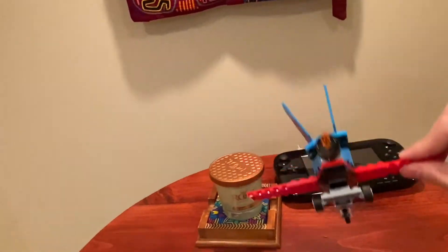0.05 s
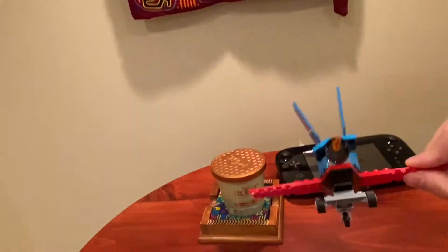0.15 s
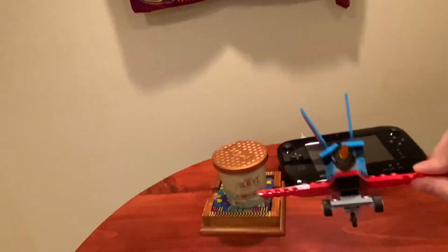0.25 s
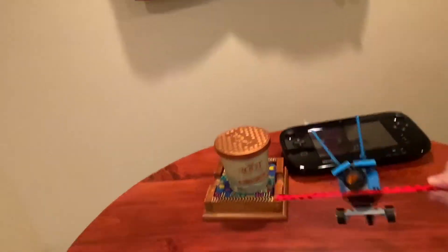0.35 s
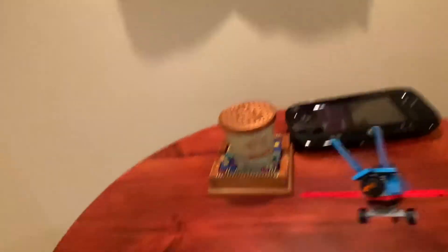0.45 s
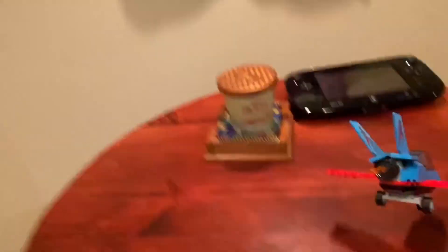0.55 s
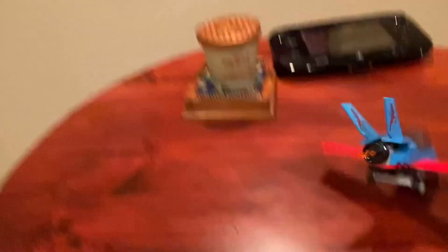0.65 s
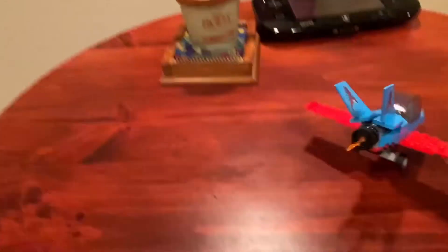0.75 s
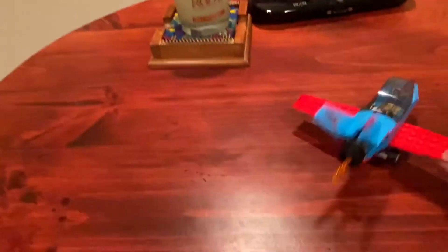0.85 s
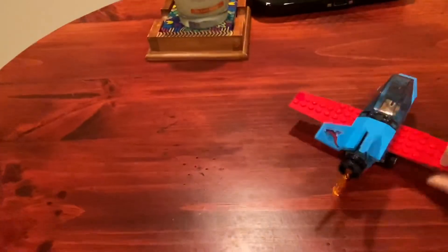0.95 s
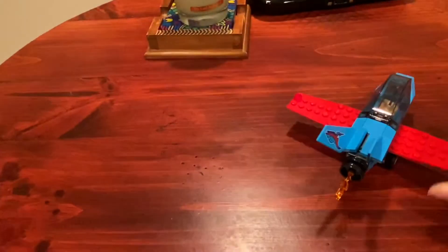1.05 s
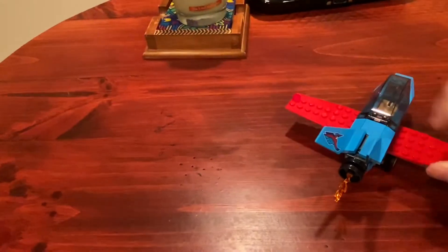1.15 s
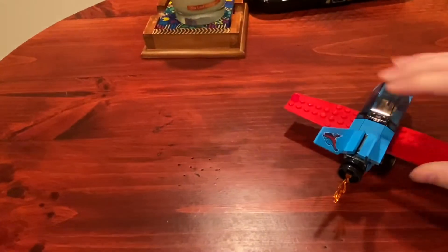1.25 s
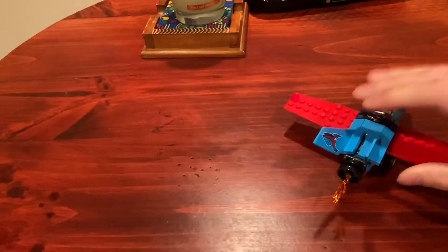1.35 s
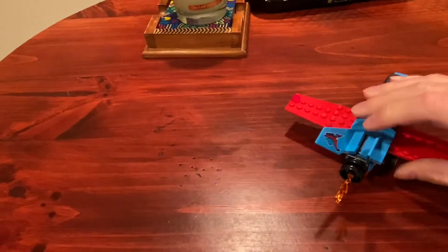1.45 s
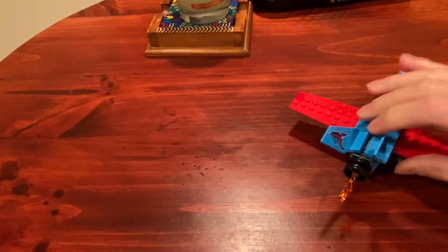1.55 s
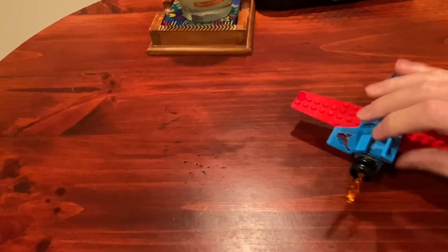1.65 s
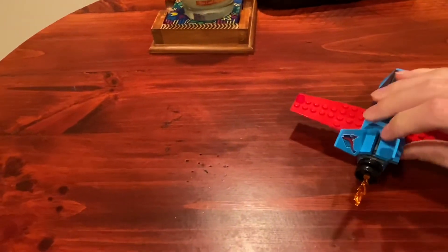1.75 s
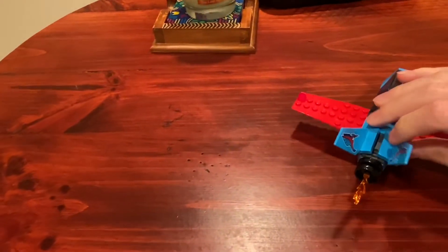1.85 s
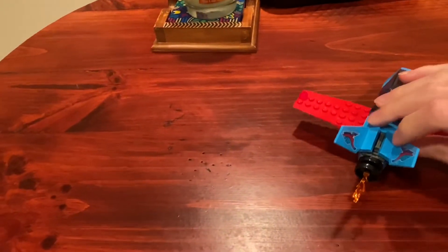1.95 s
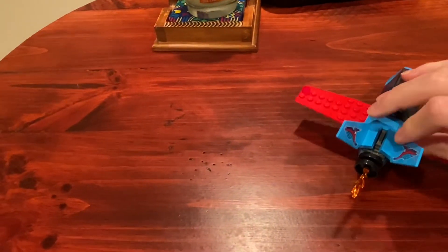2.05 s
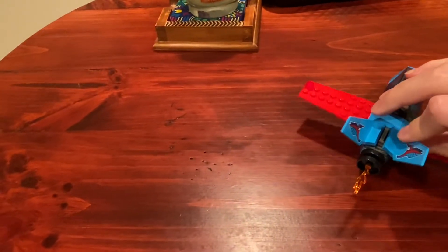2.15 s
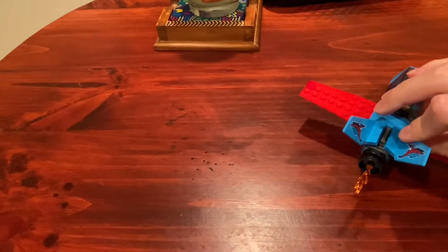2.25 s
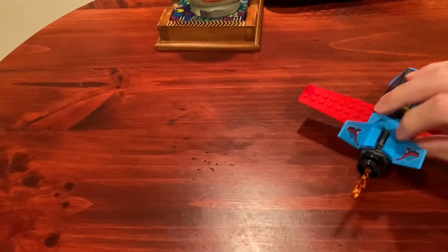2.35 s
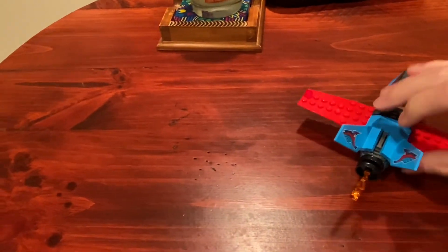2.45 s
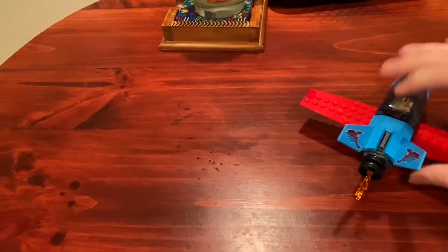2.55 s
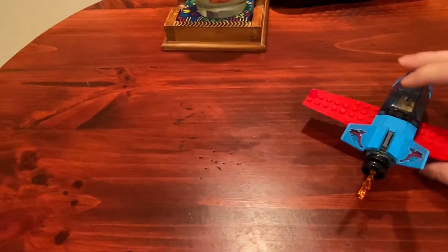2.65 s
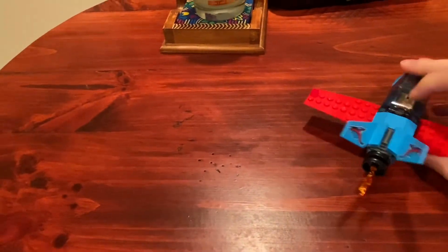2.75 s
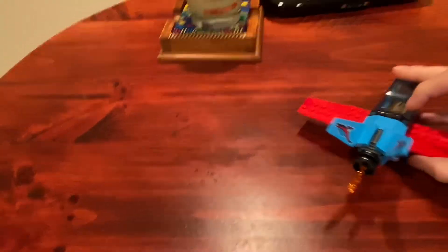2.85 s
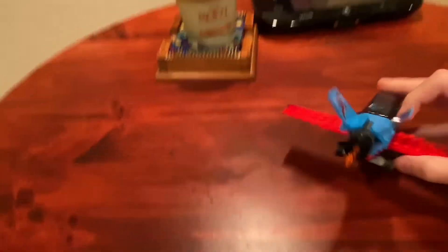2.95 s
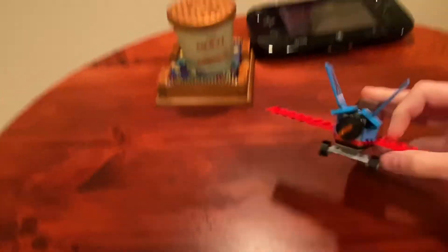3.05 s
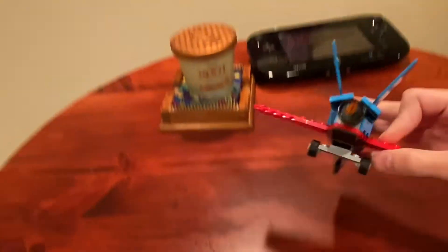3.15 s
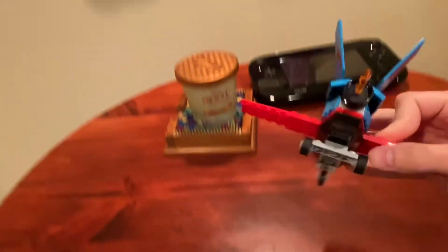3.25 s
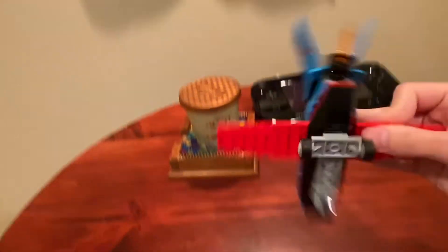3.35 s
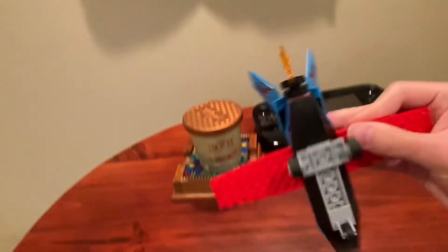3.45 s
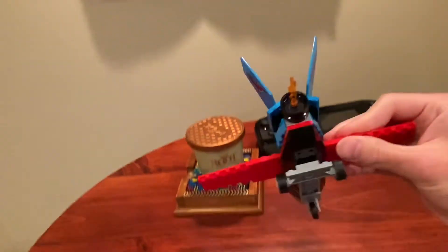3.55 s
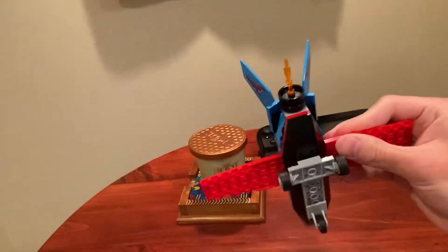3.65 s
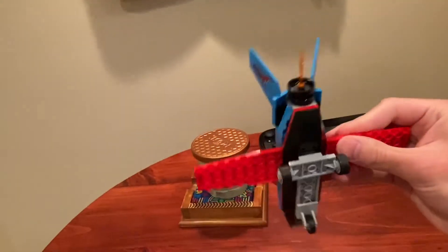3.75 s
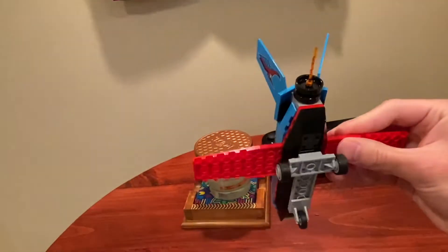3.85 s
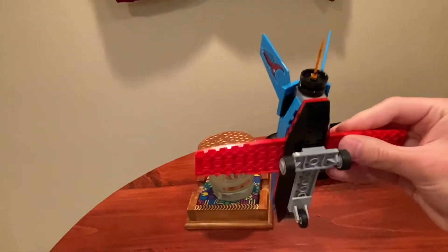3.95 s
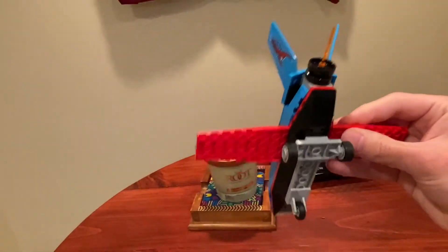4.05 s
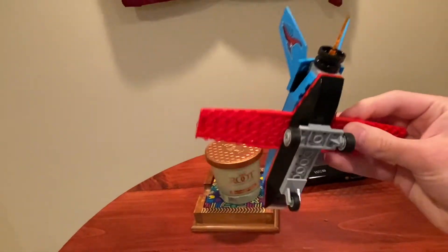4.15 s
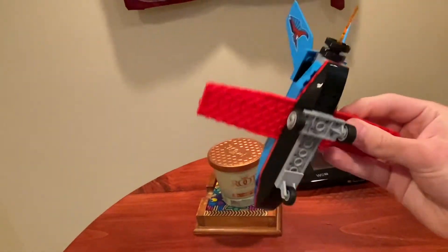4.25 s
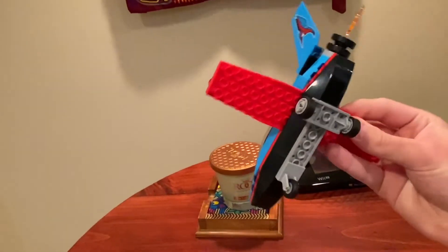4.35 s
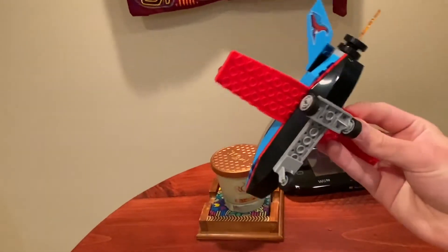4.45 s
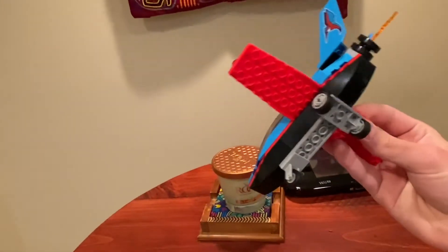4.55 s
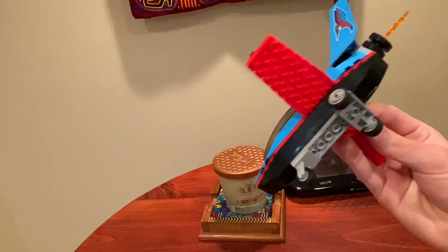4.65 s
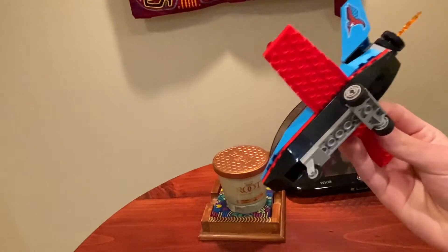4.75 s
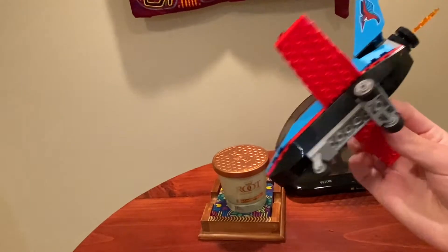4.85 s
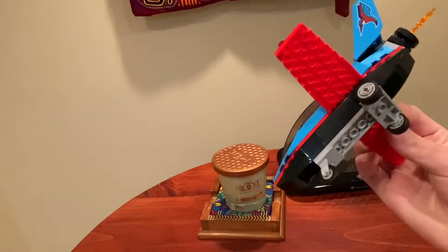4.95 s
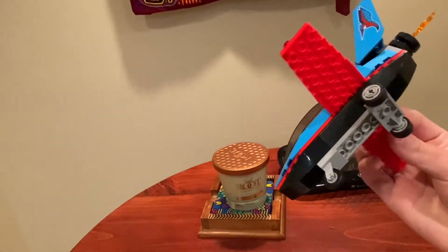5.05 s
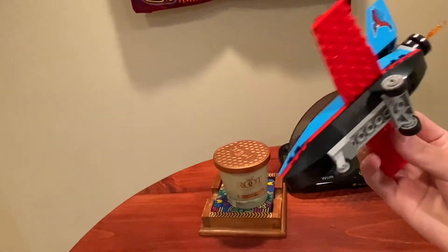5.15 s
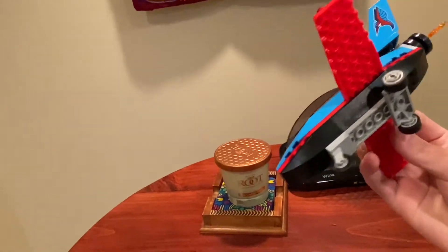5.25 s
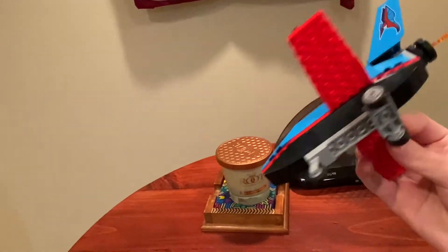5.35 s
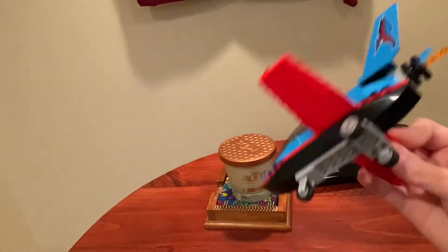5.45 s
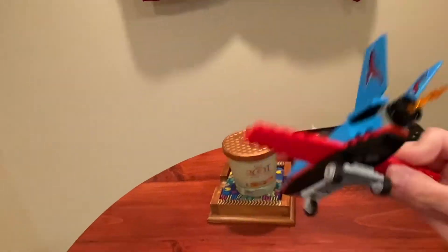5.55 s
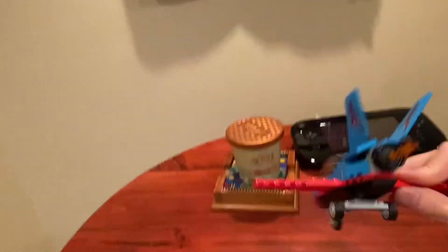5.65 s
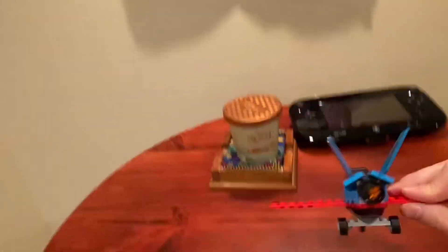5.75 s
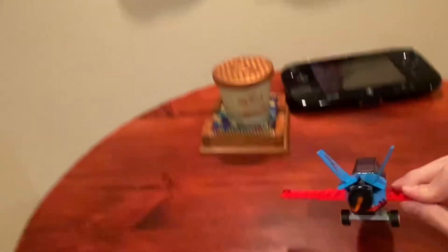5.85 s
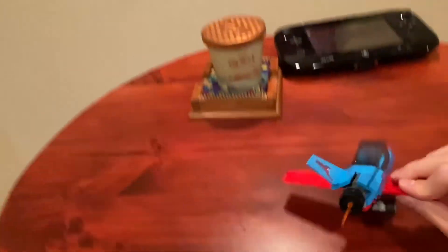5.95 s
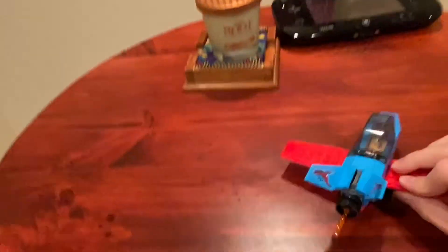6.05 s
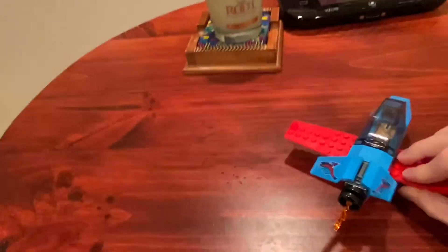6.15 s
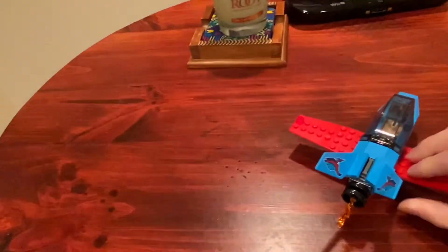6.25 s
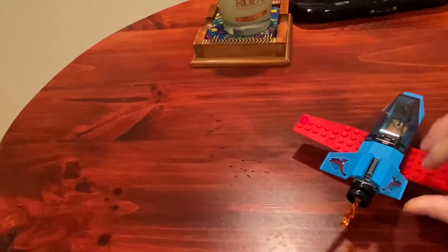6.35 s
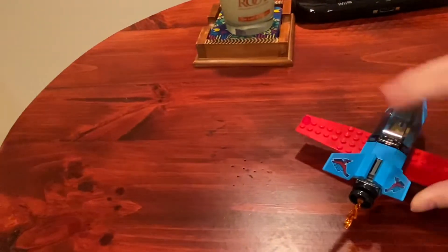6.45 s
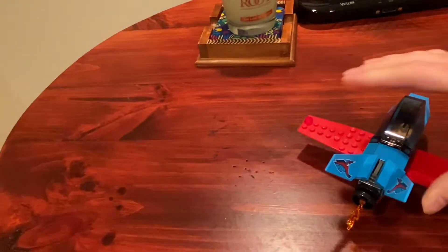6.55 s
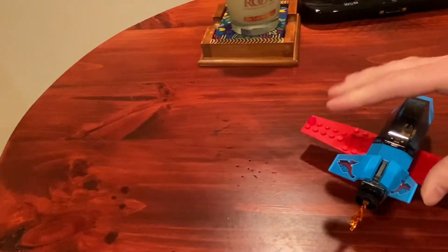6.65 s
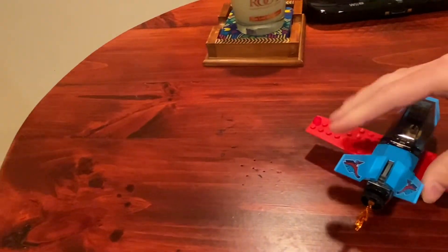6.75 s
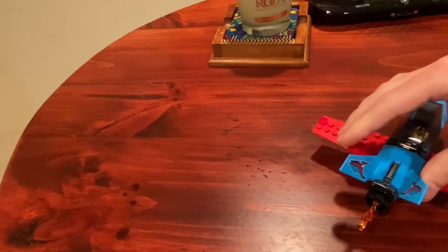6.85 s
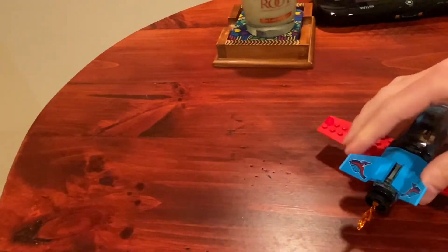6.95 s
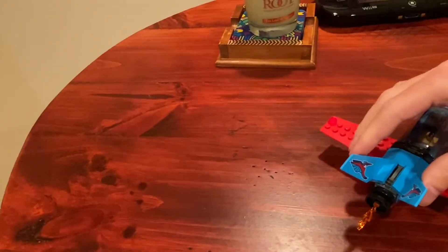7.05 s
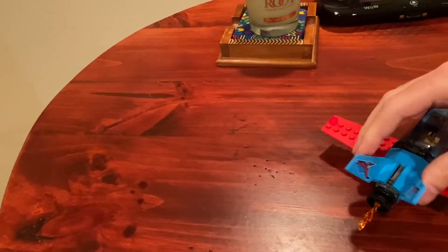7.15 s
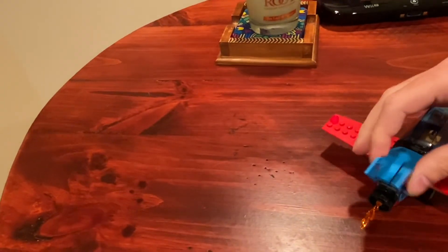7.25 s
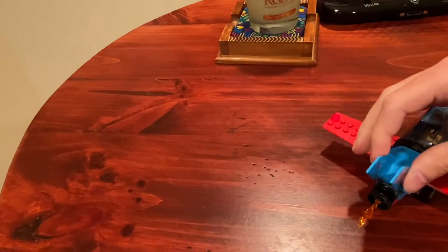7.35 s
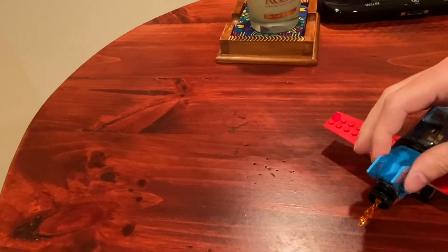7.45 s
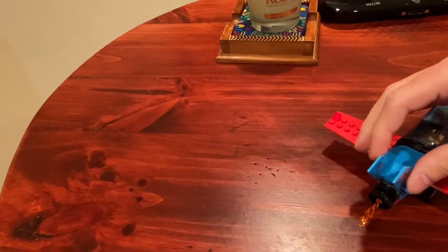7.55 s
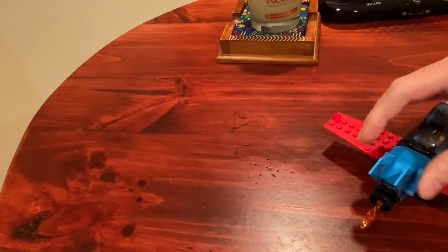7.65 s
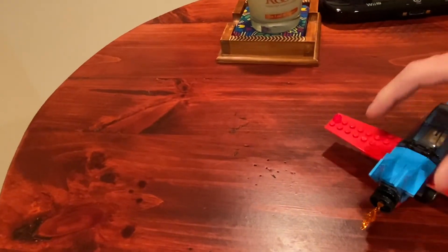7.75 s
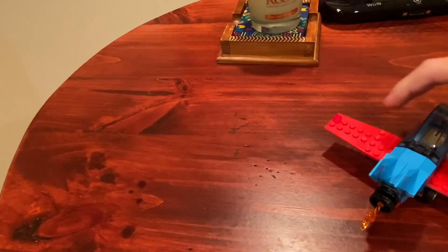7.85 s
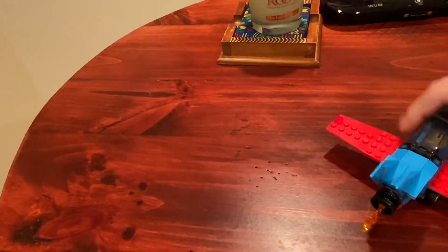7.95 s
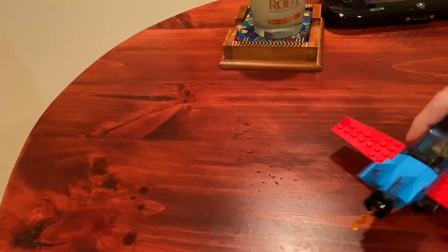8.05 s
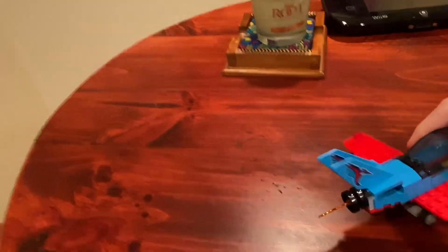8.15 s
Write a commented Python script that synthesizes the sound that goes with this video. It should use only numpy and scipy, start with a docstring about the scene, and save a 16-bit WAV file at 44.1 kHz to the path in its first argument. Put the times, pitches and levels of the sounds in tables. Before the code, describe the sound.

A small plastic brick aeroplane is handled close to a phone microphone in a small quiet room. A sharp double clack with wooden thuds and scraping comes first, then sparse light clicks as fingers press, lift and turn it. A second hard burst of clatter on the table follows, then faint ticks and a last few clicks. A low pulsing hum stays underneath.

```python
"""A plastic brick aeroplane is set down, pressed, lifted and turned over a wooden table, close to a phone.
Loud clicks, rubbing and table thuds come from 0.6 to 1 s, mostly softer ones until 5.7 s, a second loud
burst around 6 s and a last few up to 8.1 s. Chattering contacts ring the plastic, soft pushes the table,
dense slips the rubbed parts. A small room rings after them; beating hum, rumble and air run throughout.
"""
import sys
import numpy as np
from scipy import signal
from scipy.fft import rfft, irfft, next_fast_len
from scipy.io import wavfile
from scipy.ndimage import uniform_filter1d

SR = 44100
rng = np.random.default_rng(int(sys.argv[2]) if len(sys.argv) > 2 else 0)


def unload_wav(signal):
    """Save mono or channel-first audio to the path in sys.argv[1] as 16-bit WAV at rate SR, clipped to [-1, 1]."""
    wavfile.write(
        sys.argv[1],
        SR,
        np.round(np.clip(np.atleast_2d(signal).T, -1, 1) * 32767).astype(np.int16),
    )


N = 361619  # samples, 8.2 s

# ringing modes of the plastic toy: (f/Hz, level/dB)
PLASTIC_MODES = [(930, -9.5), (1200, -12.5), (1490, -12), (1790, -11.5), (2170, -10.5), (2550, -8.5),
                 (2880, -6.5), (3300, -7), (3800, -2.5), (4520, 0), (5250, 3), (6000, 5), (6760, 8),
                 (7600, -1.5), (8600, -23.5), (9730, 2.5), (11300, 3), (12600, -17.5), (15000, -26)]


def undb(db):
    """Decibels to gain."""
    return 10 ** (np.asarray(db) / 20)


def unit(x):
    """Scale to rms 1."""
    return x / np.sqrt(np.mean(x ** 2))


def band(x, lo_hz, hi_hz):
    """Band-pass."""
    return signal.sosfilt(signal.butter(2, [lo_hz, hi_hz], "band", fs=SR, output="sos"), x)


def decay(t, t60):
    """Exponential decay by 60 dB in t60 seconds."""
    return np.exp(-np.log(1000) * t / t60)


def stereo(left_minus_right_db):
    """Gains of the left and right channel for a level difference."""
    return undb([[left_minus_right_db / 2], [-left_minus_right_db / 2]])


def ring(modes, gain_db, detune, seconds):
    """Sum of decaying sines after one blow; modes are rows of (f/Hz, level/dB, t60/s)."""
    hz, db, t60 = np.transpose(modes)[:, :, None]
    t = np.arange(int(seconds * SR)) / SR
    waves = np.sin(2 * np.pi * hz * detune[:, None] * t)
    return (undb(db + gain_db[:, None]) * decay(t, t60) * waves).sum(axis=0)


def add(out, s, sound, pan_db):
    """Place a sound at time s in both channels."""
    i = int(s * SR)
    n = min(len(sound), N - i)
    out[:, i:i + n] += sound[:n] * stereo(pan_db)


def swell(s, rise_s, hold_s, fade_s):
    """Envelope: rise from time s, hold, then a steady fade by 30 dB per fade_s, down to -120 dB."""
    t = np.arange(N) / SR - s
    fades = np.clip((t - rise_s - hold_s) / max(fade_s, 1e-3), 0, 4)  # negative fade times act as 1 ms
    return np.clip(t / rise_s, 0, 1) * undb(-30 * fades)


def clicks():
    """A quick chatter of contacts rings the modes, per click in its own mix; returns phone and wall signals."""
    # clicks of the plastic, loudest near two pitches, level columns 5 to 7 against the lower pitch:
    # (t/s, peak level/dB, lower f/Hz, upper f/Hz, hollow body near 1 kHz level/dB, upper pitch level/dB,
    #  hard edges at 7 kHz level/dB, left minus right level/dB)
    click_rows = [(0.1835, -58.5, 1380.0, 5100, 1, -9, -32, -3),
                  (0.6335, -9.5, 1895, 4660, -5, -9, -11.5, -3),
                  (0.6787, -11, 1400.0, 3940.0, -13, -11.5, -12.5, -2),
                  (0.8605, -21.5, 1640, 3730, -2.5, -4.5, -12, -3.5),
                  (0.875, -23, 1810.0, 4090.0, -13, 0, -15, -1), (0.908, -23, 1850, 3600, -6, 4, -7, 0),
                  (0.9145, -23, 1780, 4050.0, -10, 3, -10, -2), (0.9468, -23.5, 1510, 2870, -2, -1, -9, -4),
                  (0.9584, -25.5, 1643, 4490.0, -11.5, -17, -28, -2),
                  (0.9909, -30, 2520, 3870, -15, 7, -6.5, 2), (1.0129, -43.5, 2460, 3960, -11, -15, -33, 2),
                  (1.4777, -51, 1830.0, 4960, -1.5, -2.5, -13.5, -3),
                  (1.6108, -59, 1610, 3830.0, -12, -15, -39, -2),
                  (1.6902, -25, 1470, 3830, -2.5, -1, -16.5, -5),
                  (1.9281, -48, 1630.0, 3820, -16, -5.5, -35, -2.5),
                  (2.3236, -53.5, 1430.0, 3680.0, 7, -21, -9, 0.5),
                  (2.3785, -57, 1470, 2840.0, -12, -17, -23, -1),
                  (2.4111, -38, 1546, 5640, -1.5, -7.5, -18, -1),
                  (2.4263, -38, 1460.0, 3940, -17, 0, -14, -3),
                  (2.457, -49.5, 1980, 4020, -16, -16, -31, -3),
                  (2.59, -48.5, 1540.0, 2920.0, 3, -14, -32.5, -1),
                  (2.6462, -41.5, 1500, 2820, -4, -19, -33, -2),
                  (2.7285, -45.5, 1570, 3650.0, -10.5, -3, -12.5, -3),
                  (2.738, -50.5, 1520, 2770, -20, -22, -33, 11),
                  (2.797, -21.5, 1622, 4020, -11.5, 2.5, -16, -2.5),
                  (2.8894, -39, 1570, 4250, -11, -3, -22, -3),
                  (3.1705, -53.5, 2130.0, 3940.0, -11, -24.5, -28, 2),
                  (3.2366, -22, 1264, 3500, -23.5, -11.5, -22.5, -0.5),
                  (3.3188, -48, 1250, 3210.0, -17, -6, -21, -3),
                  (3.336, -49, 1860, 2810.0, -25, -16, -26, -2),
                  (3.3833, -41.5, 1420, 3760, -28, -8.5, -15, -1),
                  (3.4944, -41, 1450.0, 2760, -7.5, -8, -26.5, -2),
                  (3.5243, -53.5, 1250.0, 4100, -8, 7, -8, 2),
                  (3.6223, -42, 1480, 2820.0, -10, -13.5, -11.5, -2),
                  (3.6504, -58, 1415, 3000, 1, -9, -14, 1), (3.676, -57, 1400, 4000, -19, -15, -15, -1),
                  (4.3297, -62.5, 1633, 4660, -14.5, 0.5, -22, 0),
                  (4.4359, -60, 1820, 2890, -12, -8, -36, 5),
                  (4.7871, -51.5, 1990.0, 3170, -1, -2, -17, -1),
                  (4.7982, -49.5, 1770, 3270.0, -19, 0, -19, -2),
                  (4.8134, -35.5, 1743, 3100, -12, -10.5, -19.5, -2),
                  (4.8782, -53, 1510, 2910.0, 1, 5, -15, 1), (4.9098, -48, 1930, 3880, -23, -6, -19, 2),
                  (4.941, -55, 1850, 4680.0, -20, -15, -29, -1),
                  (4.9619, -45, 1840, 4190, -12, -6.5, -16.5, -7),
                  (5.0564, -61, 1770.0, 3420.0, -23, -21, -28, -1),
                  (5.1163, -21.5, 1840, 3083, -6.5, -4.5, -15.5, -0.5),
                  (5.4736, -45.5, 1220, 3950, -8.5, -3.5, -12, 2.5),
                  (5.5122, -58.5, 1910, 2810.0, -12, -13, -25, -1),
                  (5.6768, -28.5, 1683, 4650, -13, 2.5, 1, -0.5),
                  (5.9273, -9.5, 1480, 4490, -4, -9.5, -10.5, -1.5),
                  (5.9735, -8, 1470, 4330, -9, -9.5, -11.5, -3.5),
                  (5.9966, -23.5, 1560, 3980.0, -2, -8, -13, 2), (6.0188, -15, 2480, 4660, -17, 0, -2, -4),
                  (6.0404, -14.5, 1460, 4460, -6, -9, -13.5, -2.5),
                  (6.051, -31, 1210.0, 3950, -10, 0, -19, -1), (6.0888, -24, 1480.0, 2850, 2.5, 1, -11, -2),
                  (6.1106, -29, 2510, 4200, -8, 8, -11, 0), (6.153, -29, 1560, 4700, -18, -18.5, -24, 0),
                  (6.1703, -35, 1480.0, 3970, -4, 7, 5, -30),
                  (6.5171, -65, 1300.0, 2910.0, 0.5, -4.5, -22.5, 7),
                  (6.8375, -55.5, 2130.0, 4650, -24.5, -21, -34, -5),
                  (6.8572, -40.5, 1910.0, 4040, -30, -4.5, -35, -2),
                  (6.8694, -42, 2080.0, 3930, -25, -9.5, -28, -2),
                  (6.885, -40, 1854, 3870.0, -30, -10, -32, -8),
                  (6.9056, -51, 1920.0, 3750, -37, -12, -36, -10),
                  (7.1646, -66, 2130.0, 2820, -22, -14, -33, -3),
                  (7.2629, -59, 1540, 2920.0, -24.5, -16.5, -34.5, -5),
                  (7.5406, -55, 1610.0, 5030, 0, -25.5, -10.5, 1),
                  (7.9474, -29.5, 1590.0, 3850, -14, -7.5, -19.5, -4),
                  (8.02, -52, 1530.0, 2810.0, -3, -4, -24, -3), (8.0501, -43, 1636, 2800, -17, -4, -13, -2),
                  (8.1096, -59, 1460.0, 2810.0, 1, 6.5, -25.5, -6)]
    hard_db, soft_db = -11.5, -46  # peak levels at which a blow counts as fully hard, fully soft
    valley_db, flank_db = -10, -5  # soft clicks: weaker between the two pitches, and just above the upper
    pitch_ring = 2.4  # the two pitches of a soft click ring this many times longer
    edge_tilt_db = 8.5  # 11 kHz against 7 kHz
    chatter_ms = 8.1  # contacts weaken by a factor e in this time
    main_contact = 4.2  # strength against the chatter
    graze_ms, graze_db = 1.4, -3  # weaker contacts lead up to the main one

    out, around = np.zeros((2, N)), np.zeros((2, N))
    hz = np.array(PLASTIC_MODES)[:, 0]
    size, rows = int(.06 * SR), click_rows + ticks()
    graze = int(graze_ms * SR / 1000)
    chatter_fade = np.exp(-np.arange(size) / SR * 1000 / chatter_ms)
    chance = rng.standard_normal((len(rows), 2 * size + 2 * len(hz)))
    for (s, db, low_hz, high_hz, body_db, high_db, edges_db, pan_db), c in zip(rows, chance):
        soft = np.interp(db, [soft_db, hard_db], [1, 0])
        between_hz, flank_hz = np.sqrt(low_hz * high_hz), np.sqrt(high_hz * 7000)
        between_db = high_db / 2 + soft * valley_db
        above_db = (high_db + edges_db) / 2 + soft * flank_db
        corners_hz = [950, low_hz, between_hz, high_hz, flank_hz, 7000, 11000]
        corners_db = [body_db, 0, between_db, high_db, above_db, edges_db, edges_db + edge_tilt_db]
        tone_db = np.interp(np.log(hz), np.log(corners_hz), corners_db)

        level_scatter, pitch_scatter = c[2 * size:].reshape(2, -1)
        detune, longer = 1 + .012 * pitch_scatter, np.ones(len(hz))
        for pitch_hz in (low_hz, high_hz):  # the grip pulls the nearest mode to this pitch
            k = np.argmin(np.abs(hz - pitch_hz))
            detune[k], longer[k] = pitch_hz / hz[k], pitch_ring ** soft
        body = plastic(tone_db + 2 * level_scatter, detune, longer)

        contacts = c[:size] * (c[size:2 * size] > 1.2) * chatter_fade
        contacts[:graze] *= undb(graze_db)
        contacts[graze] = main_contact
        sound = band(signal.fftconvolve(contacts, body), 1000, .45 * SR)
        scale = undb(db) / np.abs(sound).max()
        add(out, s - graze / SR, scale * sound, pan_db)
        # summed over all directions the contacts add up in power, without comb notches
        power_sum = np.sqrt(np.sum(contacts ** 2))
        add(around, s, scale * power_sum * band(body, 800, 17000), 0)
    return out, around


def ticks():
    """Faint clicks at chance moments while fingers shift, each scattered around one typical tick."""
    # spans with shifting fingers: (from t/s, to t/s)
    spans = [(1.33, 1.66), (2.2, 2.4), (3.7, 3.8), (4.2, 4.75), (5.4, 5.6), (7.03, 7.13)]
    # typical tick: (peak level/dB, lower f/Hz, upper f/Hz, body level/dB, upper pitch level/dB,
    # hard edges level/dB, left minus right level/dB)
    typical = (-70, 1600, 3900, -8, -6, -22, 0)
    # largest deviation to either side, same columns and units as the typical tick
    scatter = (4, 350, 800, 5, 5, 5, 4)
    ticks_per_s = 12
    rows = []
    for start, end in spans:
        count = max(round((end - start) * ticks_per_s), 1)
        for k, r in enumerate(rng.random((count, 8))):
            s = start + (k + r[0]) / count * (end - start)
            rows.append((s, *(typical + (2 * r[1:] - 1) * scatter)))
    return rows


def plastic(gain_db, detune, longer):
    """One blow on the toy; higher modes die sooner and neighbouring modes start in opposite directions."""
    t60_s, treble_damping = 0.011, 1.18  # ring time at 1.5 kHz, and the power of pitch that shortens it
    modes = np.array([(hz, db, more * t60_s * (1500 / hz) ** treble_damping)
                      for (hz, db), more in zip(PLASTIC_MODES, longer)])
    even = ring(modes[::2], gain_db[::2], detune[::2], .05)
    odd = ring(modes[1::2], gain_db[1::2], detune[1::2], .05)
    return even - odd


def rub():
    """Fingers and parts rub: dense uneven slips ring the plastic; each rub has its own share of treble."""
    # rubs: (full from t/s, hold t/s, fade by 30 dB t/s, dull part level/dB, treble against it level/dB)
    rub_rows = [(0.163, .014, .12, -78.5, -1), (0.858, 0.027, 0.13, -40, 4),
                (0.939, 0.0053, 0.0226, -35, 1.5), (0.999, 0.0036, -0.01, -47, -18),
                (1.474, 0.0034, -0.67, -59, -15), (1.598, 0.012, 1.7, -77, -7),
                (1.981, 0.14, -0.7, -81, -15.5), (2.124, 0.053, 0.3, -74.5, -13),
                (2.431, 0.0025, -0.02, -47, -14), (2.58, 0.044, 0.36, -60, -13.5),
                (2.893, 0.0031, 0.12, -53.5, -4), (3.315, .003, 0.12, -62, -8),
                (3.369, 0.0068, 0.15, -61, -6.5), (3.484, 0.012, -0.11, -50.5, -11),
                (3.508, 0.0036, 0.22, -85, 0), (4.252, 0.26, -0.1, -84, -16.5),
                (4.807, .003, -0.0548, -55, -2.5), (4.896, 0.035, 2.14, -84, -11),
                (4.94, 0.0045, 0.12, -64.5, -6), (5.458, 0.0042, 0.44, -74, -7),
                (6.036, 0.0012, 0.1547, -34, -9.5), (6.084, 0.0054, -0.0529, -46, 4),
                (6.156, 0.013, -0.1147, -56, -19), (6.833, 0.028, -0.5, -66, -10),
                (6.862, 0.0086, 0.11, -61.5, -8.5), (7.238, 0.011, 0.26, -79.5, -14.5),
                (7.999, 0.053, -1, -66.5, -3), (8.047, .004, 0.04, -58, -6), (8.103, .006, 0.1, -65.5, -10)]
    rise_s = 0.0013
    slips_per_s, spread_db = 1200, 0.5
    rub_ring = 1.1  # rubbed parts ring this many times longer
    slips = (rng.random((2, N)) < slips_per_s / SR) * undb(spread_db * rng.exponential(size=(2, N)))
    slips = slips * rng.standard_normal((2, N))
    count = len(PLASTIC_MODES)
    body = plastic(np.zeros(count), np.ones(count), np.full(count, rub_ring))
    rung = signal.fftconvolve(slips, body[None], axes=1)[:, :N]
    dull, bright = unit(band(rung, 1000, 3200)), unit(band(rung, 2800, 14240))
    dull_gain, bright_gain = np.zeros(N), np.zeros(N)
    for s, hold_s, fade_s, db, treble_db in rub_rows:
        grip = undb(db) * swell(s - rise_s, rise_s, hold_s, fade_s)
        dull_gain += grip
        bright_gain += grip * undb(treble_db)
    return dull_gain * dull + bright_gain * bright


def thuds(scatter_db=3.0, pan_db=-3.5, swell_cycles=0.99):
    """A soft push drives the table modes; the bending waves need a moment to fill the top."""
    # thuds of the table top: (t/s, peak level/dB, deep modes under 120 Hz level/dB, push length t/ms)
    thud_rows = [(0.632, -16, -22, 0.76), (0.677, -19, -8, 0.26), (0.856, -26.5, 3, 1),
                 (0.906, -23.5, -4, 0.77), (0.94, -22, -1, 0.79), (0.989, -28.5, -5, 0.49),
                 (1.688, -30, -5, 0.55), (2.419, -33.5, -15, 0.38), (2.438, -39, -5.5, 0.37),
                 (2.797, -23.5, -11, 0.26), (2.887, -37.5, -35, 0.8), (5.926, -15, -19, 1),
                 (5.973, -22, -17.5, 0.51), (6, -22, -15, 0.82), (6.028, -23, 1.5, 0.35),
                 (6.09, -27, -14, 0.46), (6.15, -35, -10, 0.4), (6.847, -42, -3, 0.78),
                 (7.946, -32.5, -14.5, 1), (8.039, -50.5, -6, 0.91)]
    # modes of the table top: (f/Hz, level/dB, t60 t/s)
    table_modes = [(69.3, -2.5, 0.65), (99.6, 3, 0.23), (131, -3, 0.073), (164, -12.5, .15), (192, -14, .1),
                   (237.1, -1.5, 0.26), (255, -3, 0.092), (312, 1, 0.1), (321.7, -14.5, 0.27),
                   (366, -12.5, .1), (399, -11.5, 0.033), (457, -15, 0.086), (542, -19, .06),
                   (787, -20.5, 0.15)]
    out, hz = np.zeros((2, N)), np.array(table_modes)[:, 0]
    chance = rng.standard_normal((len(thud_rows), 2, len(hz)))
    t = np.arange(int(.6 * SR)) / SR
    for (s, db, deep_db, push_ms), c in zip(thud_rows, chance):
        gain_db, detune = deep_db * (hz < 120) + scatter_db * c[0], 1 + 0.014 * c[1]
        sound = np.zeros(len(t))
        for k in range(len(hz)):
            one = slice(k, k + 1)
            fill = 1 - np.exp(-t * hz[k] / swell_cycles)
            # neighbouring modes start in opposite directions
            sound += (-1) ** k * fill * ring(table_modes[one], gain_db[one], detune[one], .6)
        sound = signal.fftconvolve(sound, np.hanning(3 + int(push_ms * SR / 1000)))
        add(out, s, undb(db) * sound / np.abs(sound).max(), pan_db)
    return out


def bumps(rise_s=0.0017, pan_db=-3.0):
    """Soft dull tones without a click: decaying sines that swell in and die away."""
    # low bumps: (t/s, level/dB, f/Hz, t60 t/s)
    bump_rows = [(1.158, -57, 67, 0.23), (1.271, -76, 59, .3), (1.497, -50.5, 99.2, 0.17),
                 (3.707, -42, 215.5, 0.23), (3.722, -49.5, 105.3, 0.16), (4.27, -45.5, 238.7, 0.061),
                 (4.28, -53, 83, .15), (5.327, -41, 197.6, 0.37), (5.342, -46.5, 87.3, 0.25),
                 (5.371, -44, 246.7, 0.2), (6.365, -42, 222, 0.2), (6.388, -40, 150, .1),
                 (6.509, -44.5, 46.2, 0.72)]
    out, t = np.zeros((2, N)), np.arange(int(.5 * SR)) / SR
    for s, db, hz, t60 in bump_rows:
        envelope = (1 - np.exp(-t / rise_s)) * decay(t, t60)
        add(out, s, undb(db) * envelope * np.sin(2 * np.pi * hz * t), pan_db)
    return out


def room(dry):
    """Wall reflections: decaying noise per band, different at each microphone."""
    # bands of the small room: (f/Hz, t60 t/s, level/dB)
    echo_bands = [(290, 0.25, -18), (800, 0.2, -3.5), (2100, 0.14, -3), (4230, 0.25, -3),
                  (6200, 0.094, -11.5), (10300, 0.12, -4)]
    t = np.arange(int(.5 * SR)) / SR
    echo = np.zeros((2, len(t)))
    for hz, t60, db in echo_bands:
        fade = decay(t, t60)
        tail = band(rng.standard_normal((2, len(t))), hz / 2.2, hz * 1.56) * fade
        echo += undb(db) * tail / np.sqrt(np.sum(fade ** 2))
    echo = echo * np.clip(t / .003 - 1, 0, 1)  # silent for 3 ms, full from 6 ms on
    return signal.fftconvolve(dry.mean(axis=0)[None], echo, axes=1)[:, :N]


def hum(pan_db=-12.0, lead=.8):
    """Two close hums from the right beat over faint steady tones; lead = radians between the microphones."""
    # both hums get louder or softer together as the phone moves; levels are those of the upper hum:
    # (t/s, rms level/dB)
    hum_levels = [(0, -63), (1.2, -62.5), (2.3, -63), (3.0, -64.5), (3.6, -62), (4.5, -64), (5.2, -65.5),
                  (6.5, -63.5), (7.3, -63), (8.2, -65)]
    # faint appliance tones: (f/Hz, rms level/dB, left minus right level/dB)
    steady_tones = [(310, -71, -0.5), (432, -70.5, -6), (9055, -109, 0)]
    upper_hz, beat_hz, lower_db = 217.79, 3.52, -4.5  # the lower hum lies beat_hz below, lower_db against it
    beat_top_s = .197  # a moment when both add up
    t = np.arange(N) / SR
    ports = np.array([[lead / 2], [-lead / 2]])
    # phase of a slow pitch wander of 0.6 Hz rms
    drift = np.cumsum(unit(uniform_filter1d(rng.standard_normal(N), 8000))) * 2 * np.pi * .6 / SR
    upper = np.sin(2 * np.pi * upper_hz * (t - beat_top_s) + ports)
    lower = np.sin(2 * np.pi * (upper_hz - beat_hz) * (t - beat_top_s) + ports)
    level = undb(np.interp(t, *np.transpose(hum_levels)))
    out = level * (upper + undb(lower_db) * lower) * stereo(pan_db)
    for hz, db, lr_db in steady_tones:
        out += undb(db) * stereo(lr_db) * np.sin(2 * np.pi * hz * t + drift + ports)
    return np.sqrt(2) * out  # from rms to peak


def rumble(side_db=-14.0):
    """Deep rumble: a wandering floor of low noise, with a few swells from the table or from handling."""
    # swells of the rumble: (start t/s, level/dB, fade by 30 dB t/s)
    swell_rows = [(0.83, -34, 0.54), (1.15, -65, 1.5), (2.3, -55, 0.56), (2.46, -60, 0.87),
                  (5.3, -62.5, 0.9), (6.05, -43.5, 0.74), (6.42, -60.5, 3)]
    floor_db, wander_db, rise_s = -72.5, 0.5, .06
    mid, side = unit(band(rng.standard_normal((2, N)), 31, 76))
    wander = unit(uniform_filter1d(uniform_filter1d(rng.standard_normal(N), size=9000), size=9000))
    gain = undb(floor_db + wander_db * wander)
    for s, db, fade_s in swell_rows:
        gain += undb(db) * swell(s, rise_s, 0, fade_s)
    return gain * (mid + undb(side_db) * side * np.array([[1], [-1]]))


def air(pan_db=2.46, alike_hz=150.6):
    """Room noise of a given spectrum; towards the bass both microphones hear more of the same."""
    # relative spectrum of the room noise: (f/Hz, level per Hz/dB)
    spectrum = [(40, -4.5), (100, -10.5), (155, -5.5), (190, -9.5), (300, -8), (370, -9.5), (440, -5.5),
                (490, -14), (530, -17.5), (760, -22.5), (1250, -31.5), (1500, -41), (2200, -43),
                (7000, -49.5), (12000, -58), (16000, -58.5)]
    level_db = -60  # rms
    f = np.maximum(np.arange(N // 2 + 1) * SR / N, 1)
    corners_hz, corners_db = np.transpose(spectrum)
    shape = undb(np.interp(np.log(f), np.log(corners_hz), corners_db))
    mid, side = rfft(rng.standard_normal((2, N))) * shape
    side = side * f / (f + alike_hz)
    out = irfft(np.array([mid + side, mid - side]), N)
    return undb(level_db) * unit(out) * stereo(pan_db)


def scene():
    """Toy and table in the room, over hum, rumble and air."""
    left_lag_s = 30e-6  # the left microphone hears toy and table later
    direct, around = clicks()
    others = thuds() + rub()
    near, walls = direct + others, room(around + others)
    size = next_fast_len(N)
    f = np.arange(size // 2 + 1) * SR / size
    near[0] = irfft(rfft(near[0], size) * np.exp(-2j * np.pi * f * left_lag_s), size)[:N]
    return near + walls + bumps() + hum() + rumble() + air()


def record(dry):
    """The phone cuts the deepest bass below 48 Hz and the top above 16.3 kHz."""
    x = signal.sosfilt(signal.butter(4, 48., "high", fs=SR, output="sos"), dry)
    return signal.sosfilt(signal.ellip(8, .2, 80, 16300, fs=SR, output="sos"), x)


dry = scene()
out = record(dry)
unload_wav(out)
```